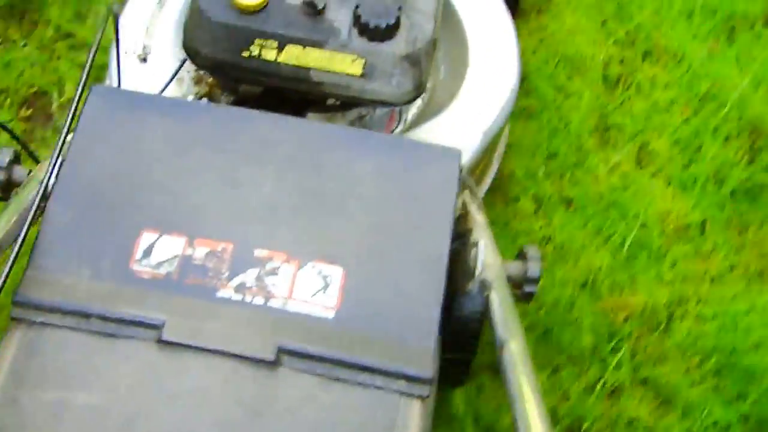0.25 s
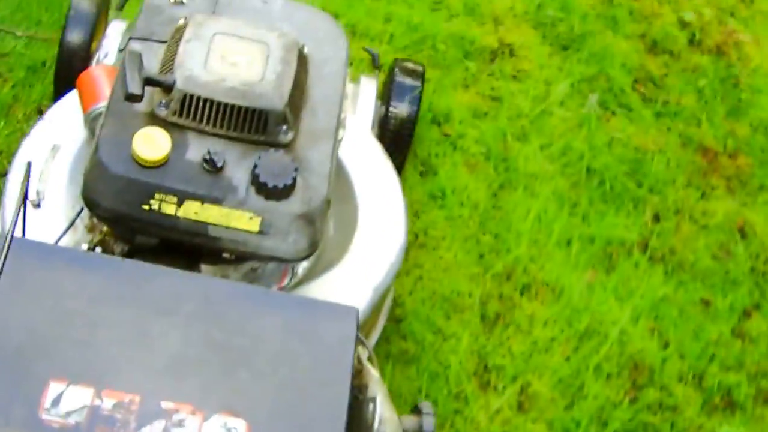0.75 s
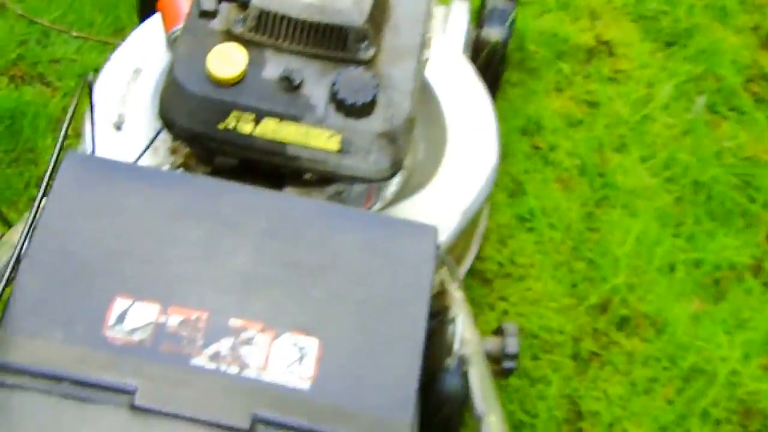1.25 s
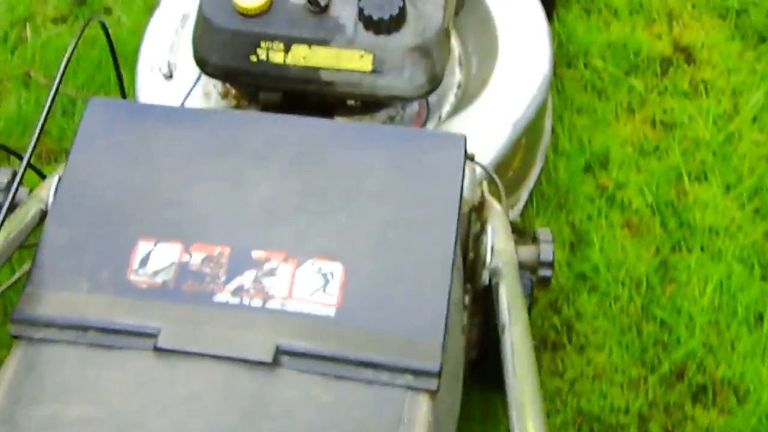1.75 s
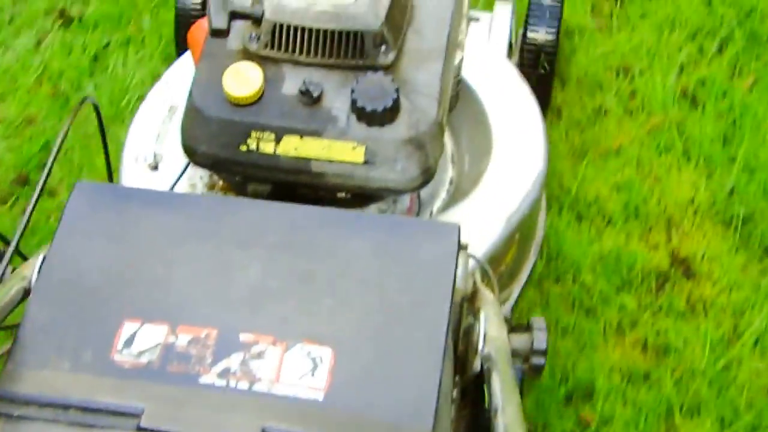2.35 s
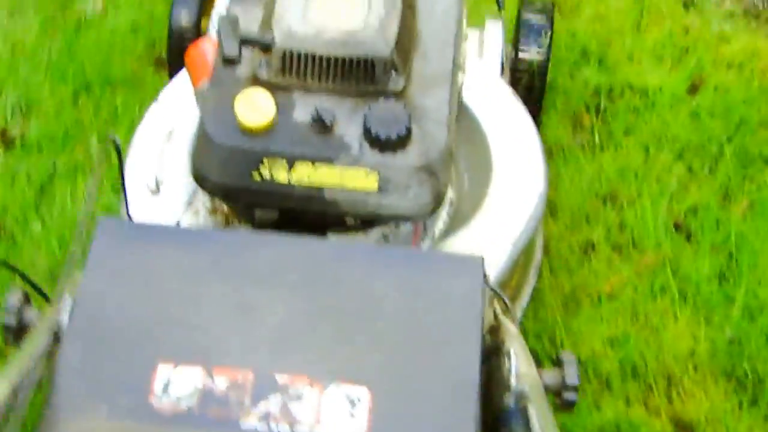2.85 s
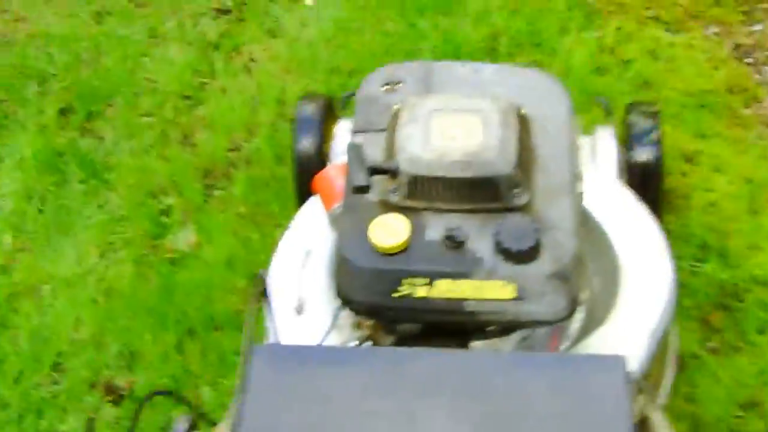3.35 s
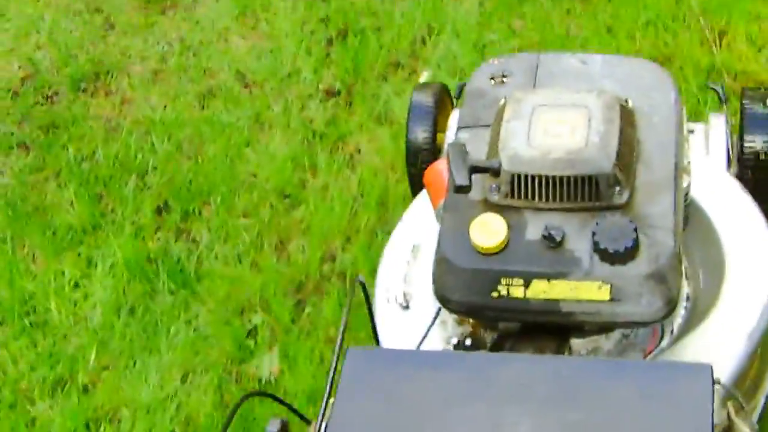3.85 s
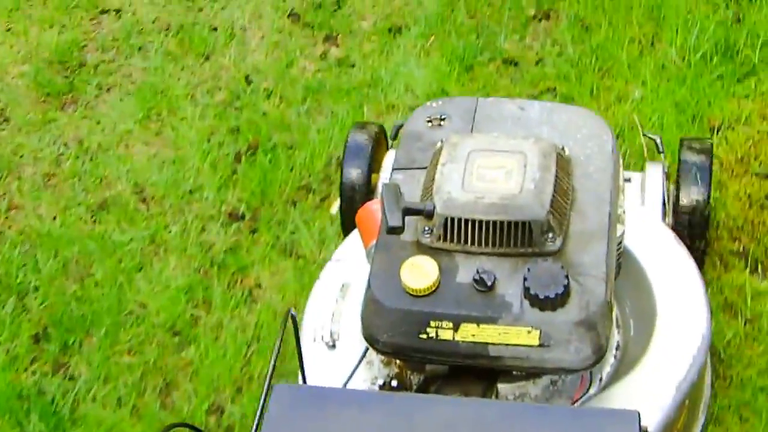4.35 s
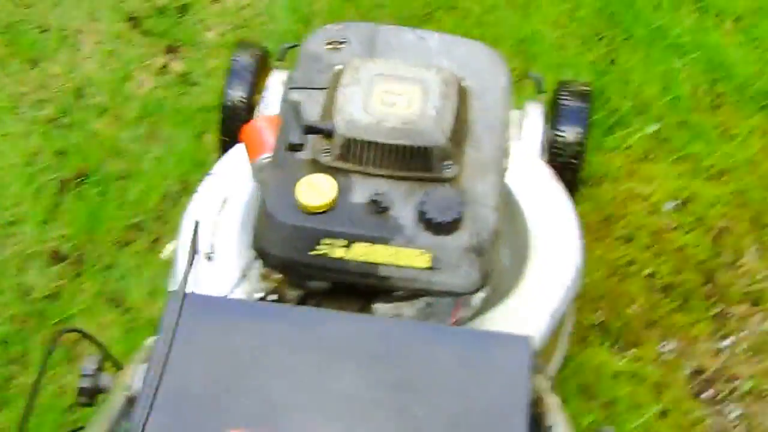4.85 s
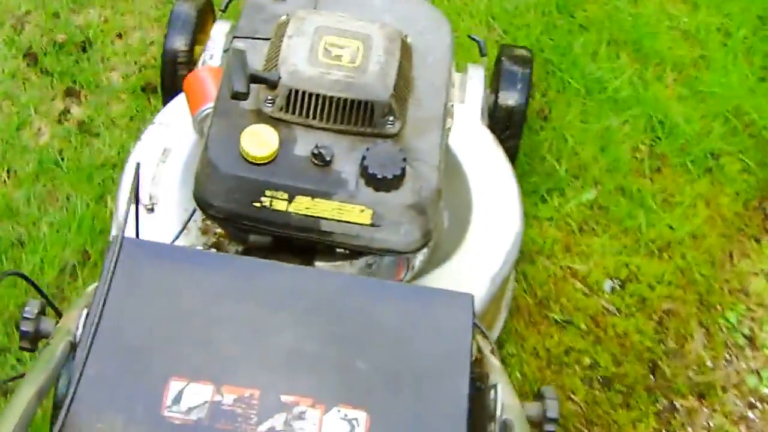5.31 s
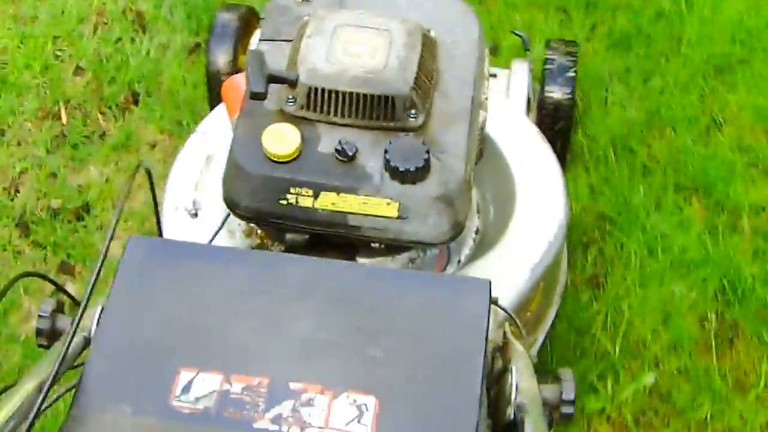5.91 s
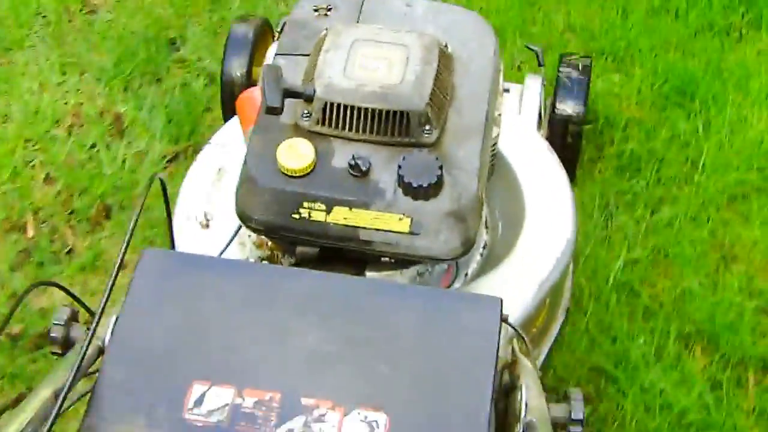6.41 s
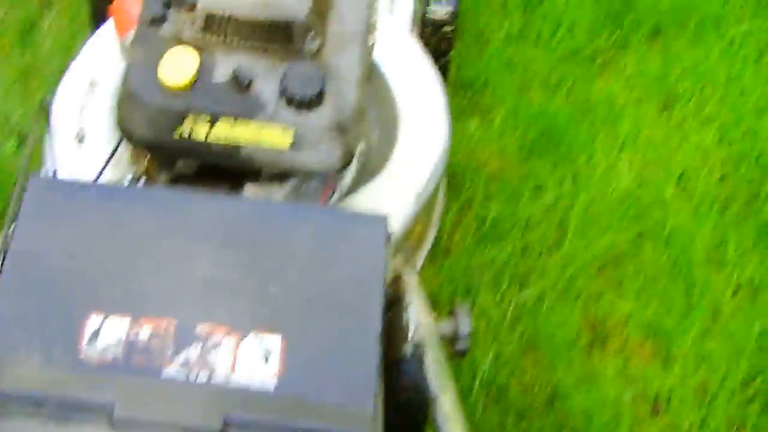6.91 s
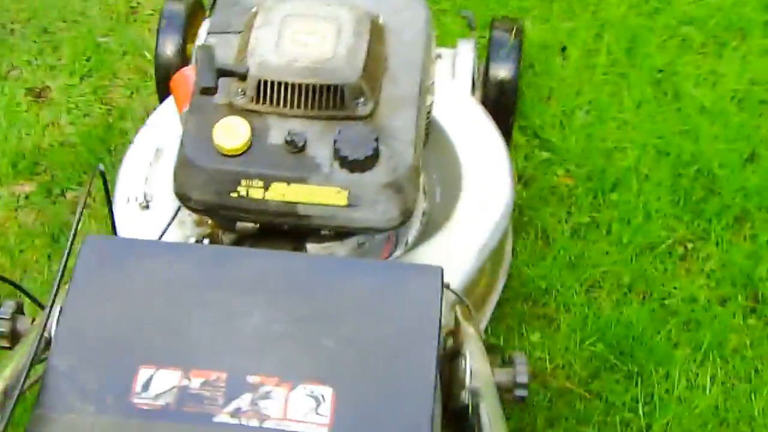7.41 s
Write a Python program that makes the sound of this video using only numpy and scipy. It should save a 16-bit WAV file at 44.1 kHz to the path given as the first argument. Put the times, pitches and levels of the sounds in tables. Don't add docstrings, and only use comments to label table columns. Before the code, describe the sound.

Close, constant roar of a petrol mower, with beating low drone, fluttering exhaust, tinny rattle and fine grass ticks, crackly and distorted.

```python
import sys
import numpy as np
from scipy import signal
from scipy.io import wavfile
from scipy.ndimage import uniform_filter1d

SR = 44100
rng = np.random.default_rng(int(sys.argv[2]) if len(sys.argv) > 2 else 0)


def inscribe(sig):
    pcm = np.round(np.clip(np.atleast_2d(sig).T, -1, 1) * 32767)
    wavfile.write(sys.argv[1], SR, pcm.astype(np.int16))


def makeup_ratio(level_db):
    decades = np.asarray(level_db, float) / 20
    return 10 ** decades


N = 338247

# (time [s], blade tips passing [Hz])
BLADE_SPEED = [(0.0, 97.179), (0.51, 97.04), (1.02, 97.485), (1.53, 97.237), (2.05, 97.587), (2.56, 97.095),
               (3.07, 97.482), (3.58, 97.175), (4.09, 97.304), (4.6, 97.488), (5.11, 97.712),
               (5.62, 97.405), (6.14, 97.355), (6.65, 97.389), (7.16, 97.549), (7.67, 97.401)]
# (time [s], swing [dB])
MICROPHONE_SWING = [(0.0, 1.5), (0.2, 3), (0.62, 1), (1.39, -1.5), (1.6, -1), (1.82, 3.5), (2.26, 2),
                    (2.5, -3.5), (2.75, 1), (3.0, 1), (3.69, -1.5), (3.97, 1), (4.36, -1.5), (4.8, -3),
                    (5.3, -2), (5.7, 0), (6.6, -1), (7.67, -1.5)]
# (time [s], load [0-1])
GRASS_LOAD = [
    (0.0, 0.3),
    (2.0, 0.0),
    (4.0, .1),
    (5.2, 0.4),
    (6.5, .9),
    (7.67, 0.9),
]
# (time [s], length [s], third order change [dB], fourth order change [dB])
SHADE = [(0.621, 0.44, -15.5, 2.5), (0.401, 0.091, -1, 5.5), (0.801, .1, 1, -3.5), (1.698, 0.26, 6, 2.5),
         (2.696, 0.18, 2.6, -5), (3.502, .2, 0.5, 2.5), (4.094, .2, -1.7, -3.5), (4.702, .15, .5, -3),
         (5.203, 0.28, 4, -1.7), (5.646, 0.18, -1.5, -5.5), (6.097, 0.1, 2.5, 0), (7.202, .2, -0.5, 2.5)]
# (multiple of the tip rate [-], level [dB])
BLADE_ORDERS = [(1.5, -33.5), (2.5, -30), (3, -19), (4, -19.5), (5, -32.5), (6, -31), (7, -29), (8, -29),
                (9, -27.5), (10, -38)]
# (pitch [Hz], level [dB])
PULLEYS = [(228, -35.5), (311, -42)]
# (multiple of the firing rate [-], level [dB])
FIRING_ORDERS = [(1, -37.5), (2, -21.5), (3, -33), (4, -33), (5, -21.5), (6, -22.5), (7, -38), (8, -38.5),
                 (9, -30), (10, -34), (11, -43), (12, -29), (13, -27.5), (14, -35.5), (15, -29), (16, -30),
                 (17, -40.5), (18, -27.5), (19, -41.5), (20, -40.5), (21, -34), (22, -31)]
# (frequency [Hz], level [dB per Hz])
ROAR = [(20, -21), (120, -14), (190, -3), (260, 1.5), (400, -2), (600, -3), (900, -5.5), (1250, -13),
        (1700, -21), (2500, -39)]
# (frequency [Hz], level [dB per Hz])
RASP = [(700, -27), (1200, -6), (1700, 0.5), (2100, 0), (2600, 3), (2950, 0.5), (3200, -6), (3800, -16),
        (5000, -32.5)]
# (frequency [Hz], level [dB per Hz])
HISS = [(2200, -29), (3000, -8.5), (3500, -5), (3800, -3.5), (4400, -5.5), (4600, -6.5), (5200, -0.5),
        (5500, -1), (7000, -31)]
# (place in the cycle [0-1], length [0-1], roar rise [dB], rasp rise [dB], hiss rise [dB])
STROKES = [
    (.02, .04, 1.5, -1.5, 0),
    (.1, .06, 0, 1.5, .5),
    (.28, .04, 0, 2.5, .5),
    (.58, .06, 0, 3, 1),
    (.7, .05, 1, 1, 2),
    (.8, .14, 0, 0, 2.5),
]
TIN_HZ = [1574, 2482, 2950, 1285, 1140, 1455, 1860, 2050, 2170, 2780, 3560, 3750, 4370, 5230]
# (width [Hz], level [dB], loudest place in the cycle [0-1], throb depth [-])
TIN = [(4, .6, .7, 1.0), (3, .4, .6, 1.9), (130, -1, .57, 1.0), (6, -1.5, .1, 1.0), (6, -35.5, .7, .6),
       (10, -43, .2, .5), (7, -40, 0, .2), (10, -41, .1, .6), (10, -43, .4, .6), (25, -39, .28, .6),
       (15, -45, .7, .6), (40, -43, .75, .6), (60, -41, .7, .6), (60, -44, .85, .6)]
# (time [s], length [s], rise [dB])
BUZZ = [
    [(.33, .12, 4), (1.3, .5, 4), (1.95, .12, -5), (2.6, .45, 4), (4.45, .2, -7), (5.1, .25, 2.5),
     (6.35, .25, 5), (7.2, .35, 3)],
    [(.7, .15, 4), (1.4, .15, 3), (2.3, .4, 4.5), (2.95, .1, 7), (3.28, .12, 10), (4.35, .2, -4),
     (5.25, .35, 5), (7.25, .2, 5)],
    [(.35, .15, 2), (2.3, .4, 6), (3.25, .2, 4), (4.4, .2, 3), (5.5, .15, 3), (7.4, .2, 3)],
    [(.5, .12, 3), (1.5, .2, 3), (2.6, .3, 2), (3.85, .2, 11), (4.35, .2, 4), (6.5, .2, 2)],
]
REST_DB = [-33, -34, -33.5, -36.5]

FIRING_START, BLADE_START = -.684, -.196
FIRINGS_PER_TIP = .251033
UNEVEN_LAG = .13
GRASS_PER_S = 500
FULL_SCALE, EDGE_HZ = .969, 5480


def evened(x):
    return x / np.sqrt(np.mean(x ** 2) + 1e-20)


def column(rows, index):
    rows = np.array(rows)
    return np.interp(np.arange(N) / SR, rows[:, 0], rows[:, index])


def follow(level_db, per_swing, per_load_db):
    swing = per_swing * column(MICROPHONE_SWING, index=1)
    return level_db + swing + per_load_db * column(GRASS_LOAD, index=1)


def swell(start_s, length_s):
    t = np.arange(0, N + 64, 64) / SR
    return np.repeat(np.exp(-((t - start_s) / length_s) ** 2), 64)[:N]


def drift(top_hz):
    t = np.arange(0, N + 64, 64) / SR
    turn, place = rng.random((2, 24, 1))
    hz = .3 * (top_hz / .3) ** place
    waves = np.sin(2 * np.pi * (hz * t + turn)) / hz ** 0.61
    return np.repeat(evened(waves.sum(0)), 64)[:N]


def tone(db, turns):
    return np.sqrt(2) * makeup_ratio(db) * np.cos(2 * np.pi * turns)


def resonate(x, hz, width):
    r = np.exp(-np.pi * width / SR)
    return signal.lfilter([1, 0, -1], [1, -2 * r * np.cos(2 * np.pi * hz / SR), r * r], x)


def noise(points, patchy_db):
    hz = np.fft.rfftfreq(1024, 1 / SR)
    point_hz, point_db = np.transpose(points)
    real, imaginary, patches = rng.standard_normal((N // 256 + 5, 513, 3)).T
    patches = uniform_filter1d(patches, size=8, axis=0)
    patches = evened(uniform_filter1d(patches, size=8, axis=1))
    colour_db = np.interp(np.log(hz + 1), np.log(point_hz + 1), point_db)[:, None]
    spectra = (real + 1j * imaginary) * makeup_ratio(colour_db + patchy_db * patches)
    return evened(signal.istft(spectra, nperseg=1024, noverlap=768)[1][:N])


def blade():
    turns = np.cumsum(column(BLADE_SPEED, index=1)) / SR + BLADE_START

    def phase(order):
        return order * turns - .22 + .7 * np.exp(-((order - 1.9) / 1.55) ** 2)

    out = tone(follow(-12, per_swing=-.5, per_load_db=-2.7), phase(order=1))
    out += tone(follow(-5, per_swing=0.76, per_load_db=0), phase(order=2))
    third_db = follow(1.3, per_swing=-0.31, per_load_db=0.39)
    fourth_db = follow(-1.5, per_swing=-0.15, per_load_db=4)
    other_db = follow(1.5, per_swing=-.2, per_load_db=-.5)
    for start_s, length_s, third_change, fourth_change in SHADE:
        shade = swell(start_s, length_s)
        third_db += third_change * shade
        fourth_db += fourth_change * shade
    changes_db = {3: third_db, 4: fourth_db}
    for order, db in BLADE_ORDERS:
        level_db = db + changes_db.get(order, other_db) + 0.064 * order * drift(top_hz=6)
        lag = UNEVEN_LAG * (order % 1 > 0)
        out += tone(level_db, phase(order) - lag + 0.0027 * order * drift(top_hz=8))
    for hz, db in PULLEYS:
        out += tone(db + 1.5 * drift(top_hz=3), hz * turns / 97.36)
    return out


def exhaust(cycle):
    out = np.zeros(N)
    for order, db in FIRING_ORDERS:
        phase = order * cycle + .38 - .19 / (1 + (order / 5.6) ** 16)
        out += tone(db + .5 * drift(top_hz=2.7) + 0.12 * order * drift(top_hz=6.1), phase)
    return out


def air(cycle):
    place, length, *rises_db = np.transpose(STROKES)[:, :, None]
    from_stroke = (cycle - place + .5) % 1 - .5
    strokes = np.exp(-(from_stroke / length) ** 2)
    roar_db, rasp_db, hiss_db = ((rise_db * strokes).sum(0) for rise_db in rises_db)
    fan_db = follow(-21.5, per_swing=-.12, per_load_db=.1)
    roar_db += follow(-16.5, per_swing=-.1, per_load_db=3.2) + 2.0 + 1.1 * drift(top_hz=26.8)
    rasp_db += fan_db - 1.0 + 0.11 * drift(top_hz=27.9)
    hiss_db += fan_db - 5.0 + 0.35 * drift(top_hz=28.5)
    roar = makeup_ratio(roar_db) * noise(ROAR, patchy_db=0.0)
    rasp = makeup_ratio(rasp_db) * noise(RASP, patchy_db=-0.4)
    hiss = makeup_ratio(hiss_db) * noise(HISS, patchy_db=1.0)
    return roar + rasp + hiss


def tin(cycle):
    out = np.zeros(N)
    for k, (hz, (width, db, place, throb)) in enumerate(zip(TIN_HZ, TIN)):
        ring = evened(resonate(rng.standard_normal(N), hz, width))
        ring = evened(ring / (uniform_filter1d(ring ** 2, size=1200) + .02) ** .47)
        if k < len(BUZZ):
            bumps_db = sum(rise_db * swell(start_s, length_s) for start_s, length_s, rise_db in BUZZ[k])
            loose_db = REST_DB[k] + bumps_db
        else:
            loose_db = 3.5 * drift(top_hz=1.5)
        throbbing = evened(np.exp(throb * np.cos(2 * np.pi * (cycle - place))))
        out += makeup_ratio(db + loose_db) * ring * throbbing
    return out


def grass():
    size = makeup_ratio(2.0 * np.minimum(rng.exponential(1, N), 4))
    hits = size * (rng.random(N) < GRASS_PER_S / SR)
    spot = rng.integers(0, 12, N)
    ticks = np.zeros(N)
    for k, hz in enumerate(np.geomspace(1900, 4600, num=12)):
        ring = evened(resonate(hits * (spot == k), hz, 0.48 * hz))
        ticks += ring * (2600 / hz) ** 0.31
    return makeup_ratio(follow(-26, per_swing=-.1, per_load_db=.2)) * evened(ticks)


def scene():
    tips_passed = np.cumsum(column(BLADE_SPEED, index=1)) / SR
    cycle = FIRINGS_PER_TIP * tips_passed + FIRING_START
    return (blade() + exhaust(cycle) + air(cycle) + tin(cycle) + grass())[None]


def top_cut(x):
    return signal.sosfilt(signal.butter(12, 15830, fs=SR, output="sos"), x)


def record(dry):
    slow = signal.resample_poly(dry, 1, 4, axis=1) - .008
    stuffed = np.zeros_like(dry)
    stuffed[:, ::4] = 4 * np.clip(slow, -FULL_SCALE, FULL_SCALE)
    short = signal.firwin(65, EDGE_HZ, window=("kaiser", 9.3), fs=SR)
    smooth = signal.oaconvolve(stuffed, short[None], "same")
    mix = np.clip(smooth, -FULL_SCALE - .002, FULL_SCALE + 0.011)
    return top_cut(mix)


dry = scene()
out = record(dry)
inscribe(out)
```